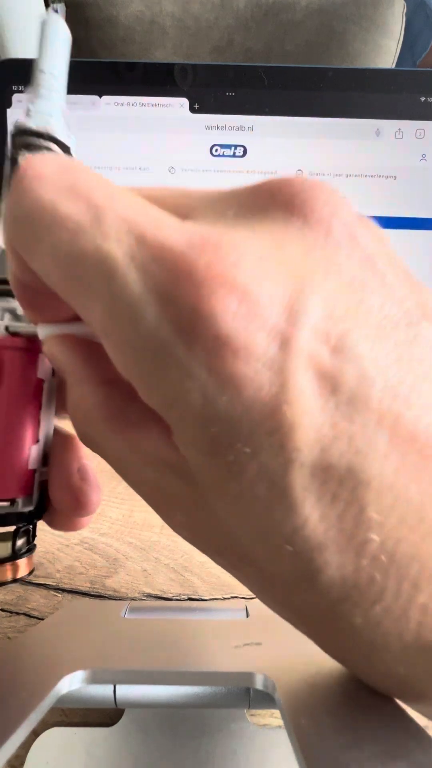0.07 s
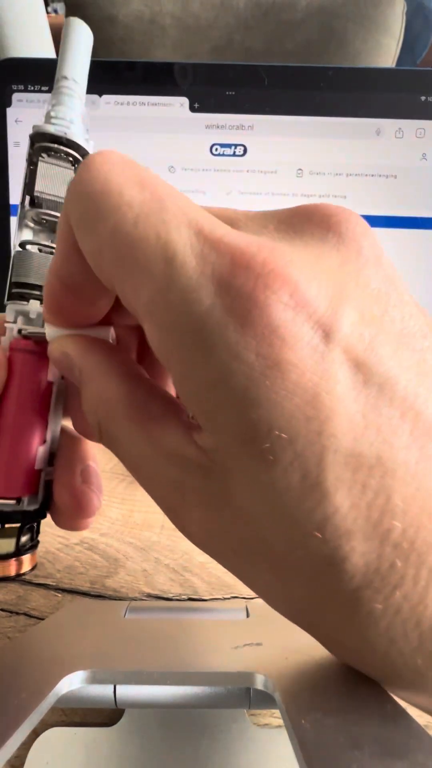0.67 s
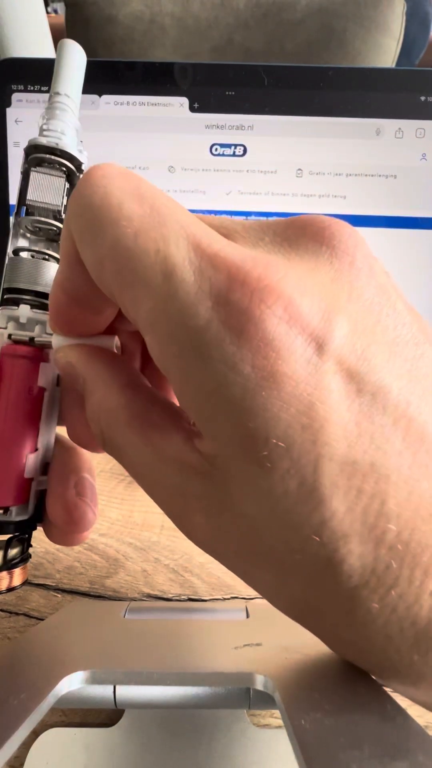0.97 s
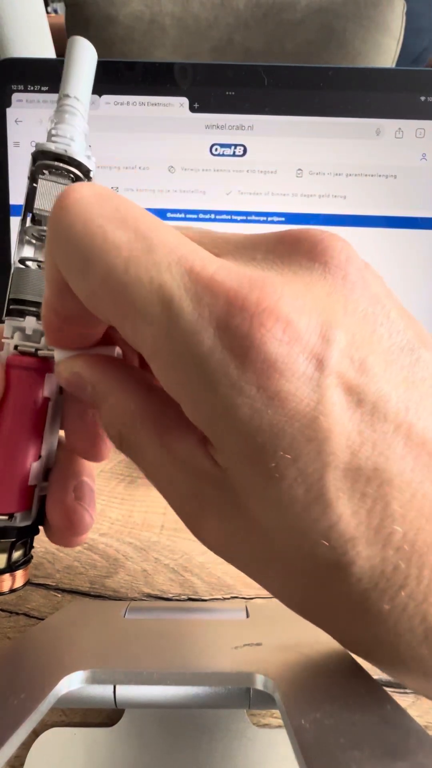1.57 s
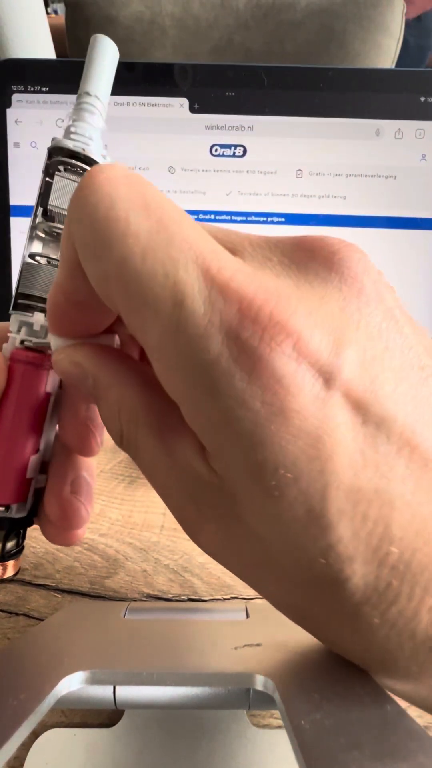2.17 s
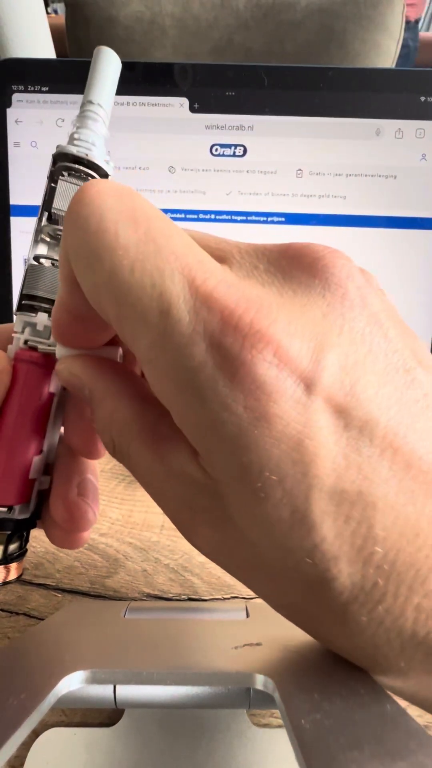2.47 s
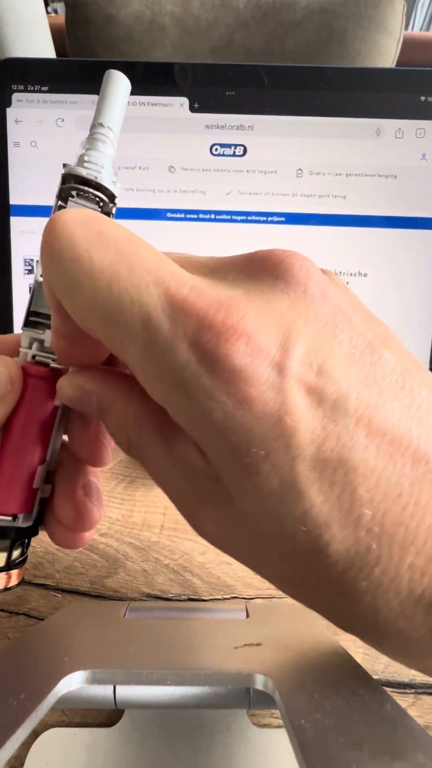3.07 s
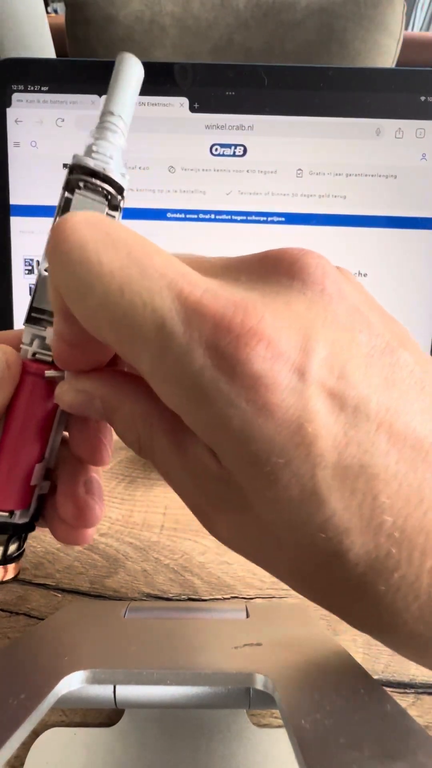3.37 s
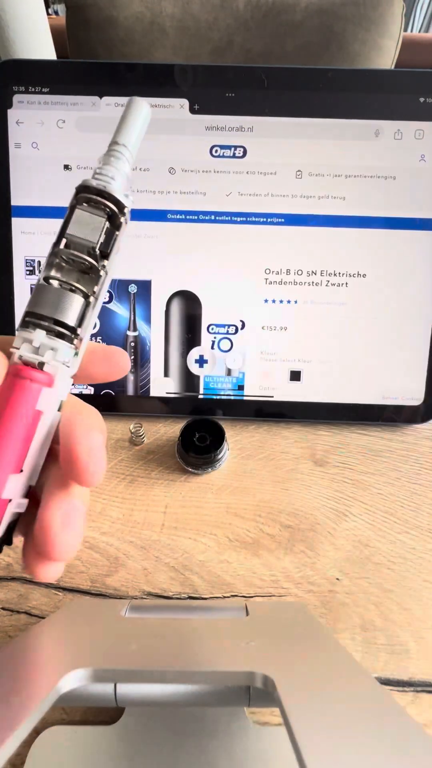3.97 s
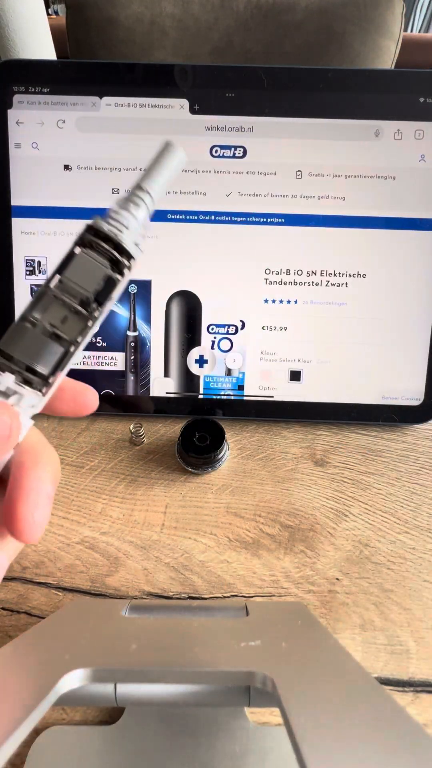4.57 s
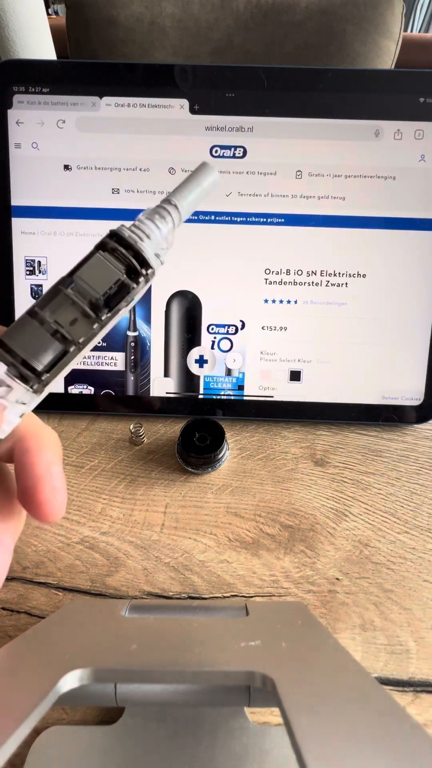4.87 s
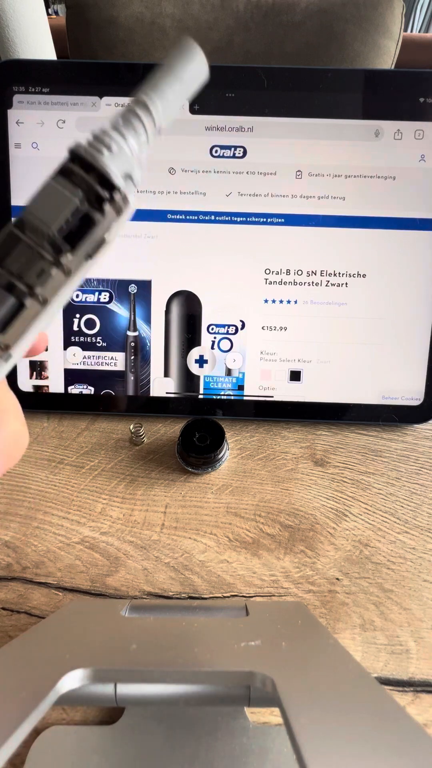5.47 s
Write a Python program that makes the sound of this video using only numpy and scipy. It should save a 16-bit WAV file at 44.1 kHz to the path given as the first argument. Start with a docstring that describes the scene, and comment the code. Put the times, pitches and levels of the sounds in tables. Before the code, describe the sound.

Close prying clicks and one sharp plastic snap, soft handling bumps, and a small metal tool clattering to rest on a wooden table.

```python
"""A wooden bench in a small, quiet room, the stereo microphone close to a handheld device.
A small steel tool pries at the battery: the plastic frame ticks, squeaks and creaks in tiny slips,
then the catch lets go with one sharp snap. Hands rub the casing and bump the bench.
The tool is put down: its tip rings and skids, then the shaft drops and rattles to rest on the right."""
import sys
import numpy as np
from scipy import signal
from scipy.fft import rfft, irfft, next_fast_len
from scipy.io import wavfile
from scipy.ndimage import uniform_filter1d

SR = 44100
rng = np.random.default_rng(int(sys.argv[2]) if len(sys.argv) > 2 else 0)


def generate_wav(signal):
    """Clip the signal to [-1, 1] and save it as 16-bit WAV at the path in sys.argv[1]."""
    frames = np.transpose(np.atleast_2d(signal))
    scaled = np.clip(frames, -1, 1) * 32767
    pcm = np.round(scaled).astype(np.int16)
    wavfile.write(sys.argv[1], SR, pcm)


N = 252693
TIME = np.arange(N) / SR
AGE = TIME[:SR // 4]   # seconds since a contact began

# resonances of the plastic frame (f/Hz, width/Hz, level/dB)
FRAME_MODES = [(1214, 320, -14), (2160, 400, -6.5), (3356, 450, -1.5), (5350, 950, -2.5), (6600, 570, 3.5),
               (8040, 540, 1.5), (9440, 800, -4), (11140, 523, -5.5), (13100, 1200, -8), (14920, 930, -10)]
# resonances of the bench under a soft blow (f/Hz, width/Hz, level/dB)
BENCH_MODES = [(124.7, 25, 1), (168, 21, -0.5), (200, 16, -0.5), (289.7, 23, 0.5), (345.7, 22.5, -3),
               (391, 24.5, -5), (545, 51.5, -1), (634.6, 50.5, -4.5), (830, 119.5, -16),
               (1096, 200.5, -9.5)]


def catch_snap():
    """The battery catch lets go: one impulse and a trace of slipping ring its resonances."""
    # resonances of the catch (f/Hz, width/Hz, level/dB)
    catch_modes = [(1242, 350, -29), (2700, 406, -22.5), (3458, 330, -20.5), (4700, 450, -16.5),
                   (5550, 525, -7.5), (6500, 630, -5.5), (7880, 390, -0.5), (8900, 650, -3),
                   (9600, 320, -4.5), (11040, 770, -16), (12720, 1050, -16.5), (14560, 610, -14.5)]
    force = (AGE == 0) + 0.043 * crunch(t60=0.016, spread=0.87)
    snap = np.zeros((2, N))
    add(snap, 1.9024, amp(21) * resonate(force, catch_modes))
    return room(from_right(snap, samples=1), wet_db=-19.5)


def prying():
    """The tool slips on the frame in ticks and loads it until it creaks."""
    # slips of the tool (t/s, mid level/dB, body re mid/dB, edge re mid/dB, crunch t60/s)
    tool_slips = [(0.406, -56, -2, -13, 0.025), (0.504, -56, -21, -30, .02), (0.509, -51.5, -19, -30, .02),
                  (0.5565, -48, -21, -12, 0.011), (0.649, -48, -6, -12, 0.014),
                  (0.743, -35.5, -4.5, -1.5, 0.012), (0.778, -52.5, -11, -18.5, 0.022),
                  (0.8345, -57.5, -8.5, 7, 0.0074), (1.3975, -57.5, -5.5, -36, 0.018),
                  (1.759, -59, -3.5, -30, 0.016), (1.802, -38.5, -5, -14, 0.013),
                  (1.8115, -36, -1.5, -3.5, 0.0074), (1.8215, -34, -19, -17, .01),
                  (2.216, -57.5, -3, -2.5, 0.017), (2.268, -59.5, -3.5, -24, 0.015),
                  (3.2665, -46.5, -8, -1, 0.035), (3.6245, -63, -11, -0.5, 0.009),
                  (3.8578, -50.5, -25.5, -1.5, .008)]
    ticks = strikes(tool_slips, FRAME_MODES, attack_s=.0018, grit=0.64, spread=0.64)
    strain = amp(-43) * envelope(1.801, attack=.011, hold=.012, t60=0.061)
    creak = strain * unit(resonate(friction(per_s=2100, spread_db=1), FRAME_MODES))
    return room(from_right(ticks + creak, samples=1), wet_db=-13)


def battery_grind():
    """The battery shifts in its bay and grinds against the hollow casing."""
    # shifts of the battery (t/s, level/dB, hold/s, t60/s)
    shifts = [(1.806, -41, .003, 0.077), (1.833, -60.5, .04, 0.37), (1.893, -57, .012, .16),
              (2.029, -58.5, .045, 0.28)]
    # resonances of the casing (f/Hz, width/Hz, level/dB)
    casing_modes = [(300.8, 16, 6.5), (522.7, 64, -3), (708, 26, 4), (1054, 160, -1.5), (1447, 350, -5.5),
                    (2180, 450, -6)]
    motion = sum(amp(db) * envelope(s, attack=.006, hold=hold, t60=t60) for s, db, hold, t60 in shifts)
    return motion * unit(resonate(friction(per_s=1600, spread_db=2), casing_modes))


def tool_rattle():
    """The shaft bounces to the right of the microphone, buzzes on the wood and wakes the board."""
    # bounces (t/s, mid level/dB, body re mid/dB, edge re mid/dB, crunch t60/s)
    bounces = [(4.5511, -39.5, -12, -36, 0.017), (4.5978, -26.5, -11.5, -25, 0.013),
               (4.6105, -31, -12, -13, 0.0086), (4.6187, -47, 2, -12, 0.012),
               (4.6377, -38.5, -9, -3, 0.0095), (4.6633, -35.5, -6, -12, 0.015),
               (4.6885, -36, -14, -13, 0.017), (4.6954, -44, -3, -18, .009), (4.7174, -44, -1.5, -8, .009),
               (4.7386, -41.5, -10, -26, .012)]
    # resonances of the shaft (f/Hz, width/Hz, level/dB)
    shaft_modes = [(1248, 280, 9.5), (1740, 450, 2.5), (2380, 530, 2), (3210, 590, 3), (4440, 230, -4.5),
                   (5860, 570, -4), (7100, 630, -7), (8170, 360, -3.5), (10050, 1300, -16.5),
                   (13960, 1650, -19)]
    # resonances of the bench top under a hard blow (f/Hz, width/Hz, level/dB)
    board_modes = [(290, 37, -7), (375, 42, -6), (536, 22, 4.5), (669.5, 19, -0.5), (850, 30, -11.5),
                   (1030, 120, -12), (1300, 43, -10), (1815, 150, -3.5), (2122, 28, -2.5), (2414, 79, -3.5)]
    clacks = strikes(bounces, shaft_modes, attack_s=.0013, grit=0.52, spread=1.0)
    chatter = aftermath([(s, 0.31 * db - 38.5) for s, db, *_ in bounces], attack=0.0064, t60=0.13)
    slips = friction(per_s=1500, spread_db=1.5)
    rumble = amp(-6.5) * unit(resonate(slips, BENCH_MODES))
    buzz = chatter * (unit(resonate(slips, shaft_modes)) + rumble)
    board = np.zeros((2, N))
    for s, db, *_ in bounces:
        knock = resonate(crunch(t60=0.052, spread=2.3), board_modes)
        add(board, s, amp(0.53 * db - 24.5) * unit_burst(knock))
    return room(from_right(clacks, samples=11) + buzz, wet_db=-11) + room(board, wet_db=-11)


def tool_tip():
    """The tip lands and skids over the grain while the free shaft sings."""
    # touches of the tip (t/s, level/dB)
    touches = [(4.2837, -42), (4.3229, -43.5), (4.3251, -37.5), (4.3334, -55), (4.3594, -49),
               (4.3994, -45.5), (4.431, -47.5), (4.4573, -47.5), (4.4934, -47.5)]
    # free ring of the steel (f/Hz, level/dB, t60/s)
    steel_modes = [(6282, -2.5, .4), (6498, .5, .36), (10550, -2, .3), (10692, 0, .34)]
    # spectrum of the skid (f/Hz, level/dB)
    skid_colour = [(800, -12), (2000, -13), (4200, -17), (6000, -6.5), (8300, -0.5), (9700, -9),
                   (11000, -8), (12500, -17.5), (16000, -22.5)]
    taps, song = np.zeros((2, N)), np.zeros((2, N))
    for s, db in touches:
        tap = resonate(crunch(t60=0.016, spread=1.0), FRAME_MODES)
        tap = cut(tap, 680, "high")   # a light point contact has little body
        add(taps, s, amp(db) * unit_burst(tap))
        add(song, s, amp(1.085 * db - 5.5) * ring(steel_modes, skew=1.6))
    free = np.clip((4.57 - TIME) / 0.062, 0, 1)   # the ring stops as the shaft meets the wood
    skid = amp(-8) * aftermath(touches[2:], attack=0.0022, t60=.2)   # the first two bounce clear
    scrape = skid * diffuse(friction(per_s=2400, spread_db=3.5), skid_colour)
    song = song * free * flutter(hz=88, depth_db=5)
    return room(taps + scrape, wet_db=-4) + room(song, wet_db=-5.5)


def squeaks():
    """The tip drags on the plastic and sings briefly in one narrow resonance."""
    # drags of the tip (t/s, length/s, f/Hz, level/dB)
    drags = [(0.151, 0.018, 5960, -72), (0.508, .02, 5550, -61), (0.56, .005, 7100, -43.5),
             (0.717, .015, 5000, -72), (1.787, 0.025, 6470, -61), (2.26, .025, 6800, -62.5),
             (3.101, 0.042, 5100, -71), (3.366, 0.043, 5010, -69.5)]
    width_hz = 170
    out = np.zeros((2, N))
    for s, length, hz, db in drags:
        swell = np.exp(-((AGE - length) / (length / 2)) ** 2)
        tone = resonate(rng.standard_normal((2, len(AGE))), [(hz, width_hz, 0)])
        add(out, s - length, amp(db) * unit_burst(swell * tone))
    return out


def bumps():
    """Soft blows of hands and device thud in the bench and set the stand on it swaying."""
    # blows (t/s, knock level/dB, sway level/dB, contact cut-off/Hz)
    blows = [(.278, -42.5, -67.5, 240), (.424, -59, -44.5, 160), (.615, -54.5, -53.5, 710),
             (.73, -50, -65, 620), (.747, -57, -55.5, 450), (0.821, -55, -68, 550), (.872, -52, -60, 610),
             (.921, -55.5, -64, 504), (1.205, -54, -64, 353), (1.811, -42.5, -37.5, 280),
             (2.035, -61, -54, 1813), (2.268, -61.5, -72, 800), (2.468, -59.5, -60, 700),
             (2.622, -58.5, -57.5, 718), (3.03, -60, -67, 419.6), (3.12, -45.5, -53.5, 266),
             (3.148, -47.5, -60, 210), (3.272, -55.5, -43.5, 500), (3.667, -51.5, -51.5, 258),
             (4.42, -49.5, -50, 570), (4.948, -52.5, -54, 139.6), (5.142, -61, -71, 539)]
    # modes of the stand (f/Hz, level/dB, t60/s)
    stand_modes = [(51.15, -1, 0.75), (66.54, 1.5, 0.67), (95, -9, 0.54)]
    knocks, sway = np.zeros((2, N)), np.zeros((2, N))
    press = 1 - np.exp(-AGE / .005)   # flesh gives way before it pushes
    lean = 1 - np.exp(-TIME[:SR] / 0.0056)
    for s, knock_db, sway_db, contact_hz in blows:
        force = press * crunch(t60=0.12, spread=0.31)
        thud = cut(resonate(force, BENCH_MODES), contact_hz, "low", order=3)
        add(knocks, s - .005, amp(knock_db) * unit_burst(thud, size=440))
        add(sway, s, amp(sway_db) * lean * ring(stand_modes, skew=0.79))
    return room(knocks, wet_db=-10) + sway


def hand_shove():
    """A hand shoves along the bench: a firm push, then it coasts to rest."""
    # spectrum of the shove (f/Hz, level/dB)
    shove_colour = [(41, -48), (70, -19.5), (124, -17), (195, -2), (314, -13), (385, -11.5), (462, -20),
                    (635, -11), (955, -22), (1650, -25), (2540, -31), (4380, -32.5), (5140, -38),
                    (8090, -36), (16000, -98)]
    onset = dict(start=0.2537, attack=0.038, hold=0.043)
    push = amp(-38) * envelope(**onset, t60=0.16)
    coast = amp(-45.5) * envelope(**onset, t60=1)
    drag = diffuse(friction(per_s=5000, spread_db=2), shove_colour)
    return room((push + coast) * drag, wet_db=-9.5)


def grip_rub():
    """Fingers shift their grip with a dull, wavering rub."""
    # shifts of grip (t/s, level/dB)
    regrips = [(.27, -58.5), (.74, -54.5), (1.28, -63.5), (1.93, -63.5), (3.16, -66), (3.74, -63.5),
               (4.0, -67.5), (4.47, -61), (5.42, -74.5)]
    # spectrum of the rub (f/Hz, level/dB)
    rub_colour = [(35, -25.5), (70, -6.5), (150, -2), (300, -3), (600, -8.5), (1100, -19.5), (2000, -31.5),
                  (5000, -67)]
    length_s = 0.55
    grip = movements([(s, length_s, db) for s, db in regrips])
    return grip * diffuse(friction(per_s=900, spread_db=2), rub_colour) * flutter(hz=30, depth_db=3.5)


def skin_strokes():
    """Skin rasps and hisses over the casing in light strokes and two long slides."""
    # strokes (t/s, length/s, rasp level/dB, hiss level/dB)
    strokes = [(0.125, 0.36, -80.5, -82), (0.275, 0.19, -65.5, -69.5), (0.958, 0.22, -70.5, -74),
               (1.176, 0.22, -69, -73.5), (1.278, 0.23, -70, -76), (1.467, 0.69, -78, -79),
               (2.064, 0.15, -59.5, -60.5), (2.263, .3, -69.5, -71.5), (2.484, 0.21, -74, -77),
               (2.608, 0.21, -73, -77.5), (2.762, 0.21, -64, -66.5), (3.026, 0.34, -68, -74),
               (3.246, 0.32, -73.5, -85)]
    # one curve a slide, as the hand lets go and turns the device (t/s, rasp level/dB, hiss level/dB)
    slides = [
        [(3.45, -81, -80), (3.594, -69.5, -74), (3.688, -65.5, -65), (4.034, -66, -61), (4.08, -68, -65.5),
         (4.138, -82, -76), (4.2, -79.5, -74.5)],
        [(5.0, -93, -80), (5.124, -89, -71), (5.14, -75.5, -69.5), (5.298, -71.5, -66), (5.49, -69.5, -75),
         (5.592, -98, -83), (5.7, -94, -85)],
    ]
    # spectrum of the rasp (f/Hz, level/dB)
    rasp_colour = [(400, -10.5), (1100, -4.5), (2200, 0), (3500, -2), (5000, -3), (7000, -10.5),
                   (12000, -25.5)]
    # spectrum of the hiss (f/Hz, level/dB)
    hiss_colour = [(3000, -18), (5000, -7), (6500, -1), (8300, 7.5), (9500, -7), (11000, -16.5),
                   (15000, -19.5)]
    rasp_gain = movements([(s, length, db) for s, length, db, _ in strokes])
    hiss_gain = movements([(s, length, db) for s, length, _, db in strokes])
    for slide in slides:
        rasp_gain += eased_curve([(s, db) for s, db, _ in slide])
        hiss_gain += eased_curve([(s, db) for s, _, db in slide])
    rasp = rasp_gain * diffuse(friction(per_s=9000, spread_db=1.5), rasp_colour)
    hiss = hiss_gain * diffuse(friction(per_s=13000, spread_db=1.5), hiss_colour)
    return (rasp + hiss) * flutter(hz=24.9, depth_db=2)


def squeezes():
    """Fingertips squeeze the casing and creep on the plastic in short, soft creaks."""
    # squeezes (t/s, level/dB)
    presses = [(.15, -70), (1.21, -67.5), (1.295, -69), (1.355, -68), (1.43, -66), (2.27, -70.5),
               (2.62, -73), (3.219, -71.5), (4.21, -68)]
    # resonances of a fingertip on plastic (f/Hz, width/Hz, level/dB)
    finger_modes = [(800, 95, -5.5), (1059, 140, 2), (1355, 180, -7.5)]
    pressure = sum(amp(db) * np.exp(-((TIME - s) / 0.013) ** 2) for s, db in presses)
    creep = unit(resonate(friction(per_s=820, spread_db=3.5), finger_modes))
    return room(pressure * creep, wet_db=-9.5)


def room_tone():
    """The steady, low hush of the still room."""
    # spectrum of the hush (f/Hz, level/dB)
    air_colour = [(15, -34), (25, -8), (55, -1.5), (157, -6.5), (335, -16), (405, -20.5), (677, -22),
                  (988, -29.5), (1480, -26), (2840, -32), (5140, -41.5), (5880, -27), (6740, -40),
                  (8140, -37.5), (14400, -49), (16000, -58)]
    return amp(-67) * diffuse(rng.standard_normal((2, N)), air_colour)


def room(x, wet_db):
    """Direct sound, then after a short gap diffuse reflections that die faster in the treble."""
    # decay of the room (f/Hz, t60/s)
    decay_times = [(150, 0.57), (600, 0.46), (2500, 0.4), (7000, 0.38), (11000, 0.084), (16000, 0.22)]
    t, edges = TIME[:SR * 3 // 4], np.geomspace(60, 19000, 11)
    tail = 0
    for low, high in zip(edges, edges[1:]):
        t60 = at_hz(decay_times, np.sqrt(low * high))
        band = cut(rng.standard_normal((2, len(t))), [low, high], "band")
        tail = tail + band * amp(-60 * t / t60)
    onset = np.clip((t - .002) / 0.0039, 0, 1)
    tail = unit(tail * onset) / np.sqrt(len(t))
    return x + amp(wet_db) * signal.fftconvolve(x, tail, axes=1)[:, :N]


def diffuse(force, spectrum):
    """Colour two unrelated forces and blend them as mid and side into stereo of rms 1."""
    # likeness of left and right at the microphone (f/Hz, correlation)
    likeness = [(50, 0.86), (140, 0.53), (290, 0.34), (640, -0.85), (1400, 0.083), (3000, 0.24),
                (15000, 0.12)]
    size = next_fast_len(N)
    hz = np.arange(size // 2 + 1) * SR / size
    mid, side = rfft(force, size) * amp(at_hz(spectrum, hz))
    alike = at_hz(likeness, hz)
    stereo = np.sqrt(1 + alike) * mid + np.sqrt(1 - alike) * side * [[1], [-1]]
    return unit(irfft(stereo, size)[:, :N])


def strikes(rows, modes, attack_s, grit, spread):
    """Hard clicks with a slightly softened attack; each has its own amount of body and brightness."""
    out = np.zeros((2, N))
    fade_in = np.minimum(AGE / attack_s, 1) ** 2
    impulse = np.arange(len(AGE)) == round(attack_s * SR)
    for s, db, body_db, edge_db, crunch_t60 in rows:
        hit = resonate(impulse + grit * fade_in * crunch(crunch_t60, spread), modes)
        body = amp(body_db) * unit_burst(cut(hit, 4500, "low", order=4))
        mid = unit_burst(cut(hit, [4500, 10000], "band", order=3))
        edge = amp(edge_db) * unit_burst(cut(hit, 10000, "high", order=6))
        add(out, s, amp(db) * (body + mid + edge))
    return out


def crunch(t60, spread):
    """Contact force: a dying burst of noise; spread sets how much the sides differ."""
    noise = rng.standard_normal(len(AGE)) + spread * rng.standard_normal((2, len(AGE)))
    return noise * amp(-60 * AGE / t60)


def friction(per_s, spread_db):
    """Stick-slip: random tiny releases of uneven size."""
    sizes = amp(spread_db * np.minimum(rng.exponential(1, N), 4))
    return (rng.random(N) < per_s / SR) * sizes * rng.standard_normal((2, N))


def resonate(x, modes):
    """Parallel resonances of alternating sign."""
    out = 0
    for k, (hz, width, db) in enumerate(modes):
        r = np.exp(-np.pi * width / SR)
        poles = [1, -2 * r * np.cos(2 * np.pi * hz / SR), r * r]
        gain = (-1) ** k * amp(db) * (1 - r * r) / 2
        out = out + gain * signal.lfilter([1, 0, -1], poles, x + 1e-18)
    return out


def ring(modes, skew):
    """Free ring of lightly damped modes; skew is the phase step between the sides in radians."""
    t = TIME[:SR]
    phases = rng.uniform(0, 2 * np.pi, len(modes))
    sides = skew * np.array([[.5], [-.5]])
    return sum(amp(db - 60 * t / t60) * np.sin(2 * np.pi * hz * t + phases[k] + sides * (-1) ** k)
               for k, (hz, db, t60) in enumerate(modes))


def envelope(start, attack, hold, t60):
    """Gain with a straight rise, a hold and a dying fall, all in seconds."""
    age = TIME - start
    return np.clip(age / attack, 0, 1) * amp(-60 * np.clip((age - attack - hold) / t60, 0, 2))


def aftermath(hits, attack, t60):
    """Gain of a motion that every hit (t/s, level/dB) feeds and that dies away between them."""
    return np.sqrt(sum((amp(db) * envelope(s, attack, 0, t60)) ** 2 for s, db in hits))


def movements(rows, swell_share=0.34):
    """Gain of hand movements (t/s, length/s, level/dB) that each swell to their moment and fade."""
    power = 0
    for s, length, db in rows:
        away = np.maximum((s - TIME) / swell_share, (TIME - s) / (1 - swell_share)) / length
        power = power + amp(db) ** 2 * np.exp(-3.5 * np.minimum(away, 4) ** 1.124)
    return np.sqrt(power)


def eased_curve(rows, ease_db_per_s=45):
    """Gain along a curve (t/s, level/dB), easing away beyond its ends."""
    s, db = np.transpose(rows)
    beyond = abs(TIME - np.clip(TIME, s[0], s[-1]))
    return amp(np.interp(TIME, s, db) - ease_db_per_s * beyond)


def flutter(hz, depth_db):
    """Random wavering gain."""
    knots = rng.standard_normal(1000)
    return amp(depth_db * np.interp(TIME * hz, np.arange(len(knots)), knots))


def from_right(x, samples):
    """The sound reaches the left side of the microphone a little later."""
    return np.array([np.roll(x[0], samples), x[1]])


def amp(db):
    """Decibels to gain."""
    return 10 ** (np.asarray(db) / 20)


def unit(x):
    """Scale to rms 1."""
    return x / np.sqrt(np.mean(x ** 2) + 1e-24)


def unit_burst(x, size=88):
    """Scale so that the loudest stretch of size samples has rms 1."""
    return x / np.sqrt(uniform_filter1d(np.mean(x ** 2, axis=0), size).max() + 1e-24)


def at_hz(points, hz):
    """Read a table on a log-frequency axis."""
    points = np.array(points)
    return np.interp(np.log(np.maximum(hz, 1)), np.log(points[:, 0]), points[:, 1])


def cut(x, hz, kind, order=2):
    """Butterworth filter."""
    return signal.sosfilt(signal.butter(order, hz, kind, fs=SR, output="sos"), x)


def add(out, s, sound):
    """Mix a sound in at time s."""
    start = round(s * SR)
    out[:, start:start + sound.shape[-1]] += sound[..., :N - start]


def scene():
    """Device, tool and hands close up, over the hush of the room."""
    device = catch_snap() + prying() + battery_grind()
    tool = tool_rattle() + tool_tip() + squeaks()
    hands = bumps() + hand_shove() + grip_rub() + skin_strokes() + squeezes()
    return device + tool + hands + room_tone()


def record(dry):
    """The microphone drops the rumble, rounds the tallest peak and cuts the very top."""
    ceiling, top_hz = .95, 16300
    rounded = ceiling * np.tanh(cut(dry, 28, "high", order=3) / ceiling)
    return signal.sosfilt(signal.ellip(10, .1, 80, top_hz, fs=SR, output="sos"), rounded)


dry = scene()
out = record(dry)
generate_wav(out)
```